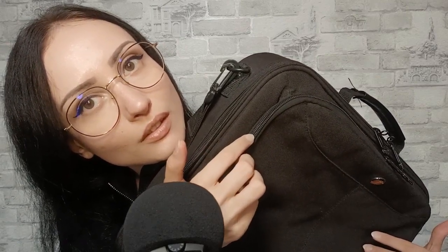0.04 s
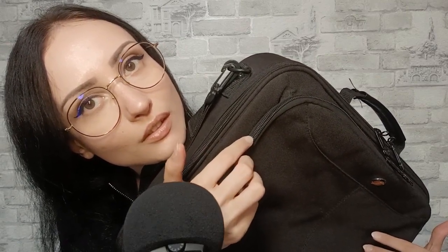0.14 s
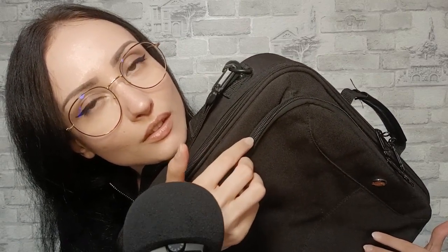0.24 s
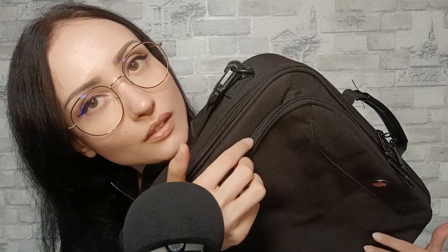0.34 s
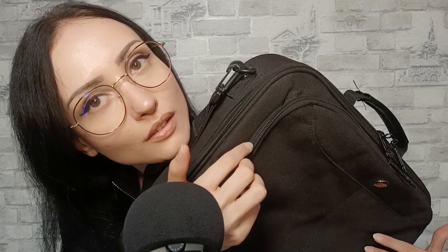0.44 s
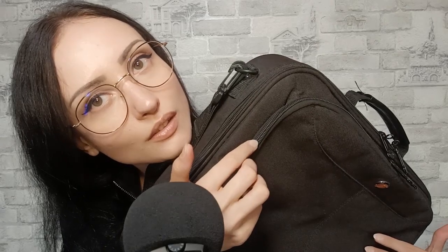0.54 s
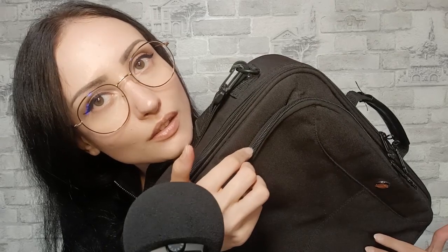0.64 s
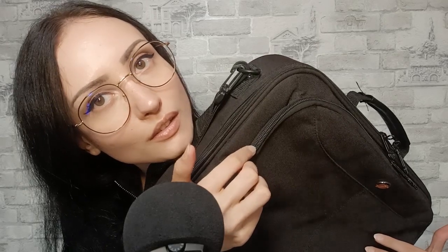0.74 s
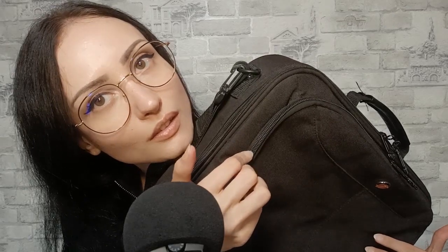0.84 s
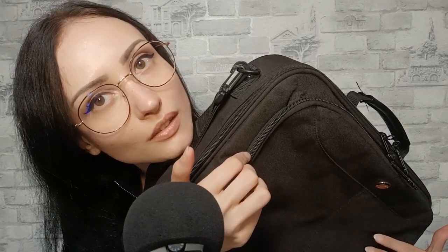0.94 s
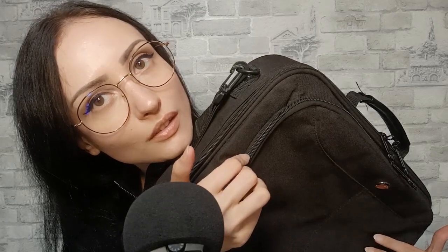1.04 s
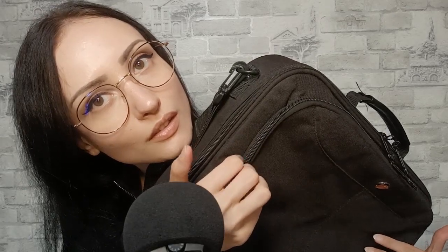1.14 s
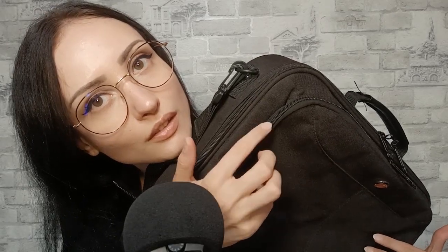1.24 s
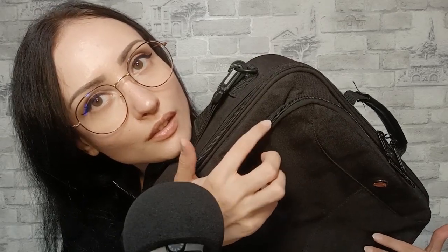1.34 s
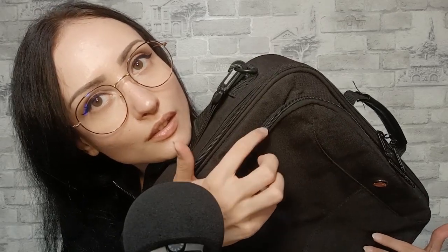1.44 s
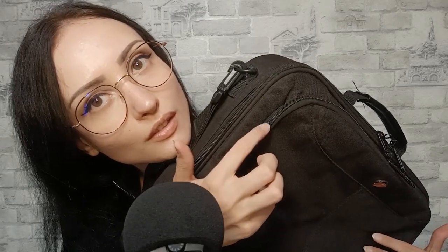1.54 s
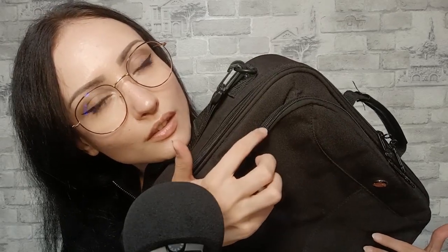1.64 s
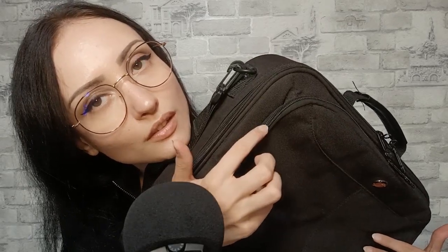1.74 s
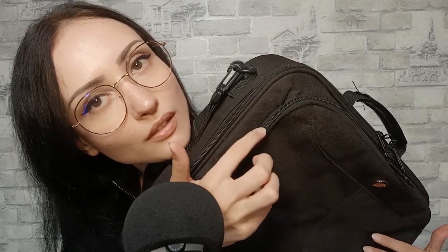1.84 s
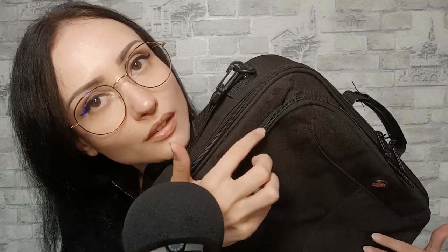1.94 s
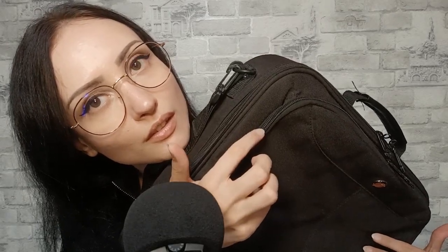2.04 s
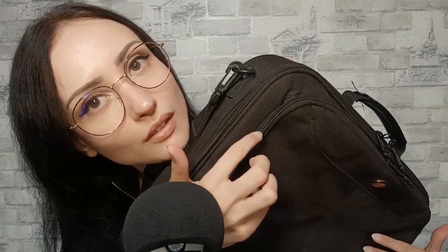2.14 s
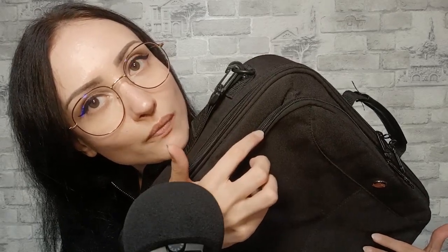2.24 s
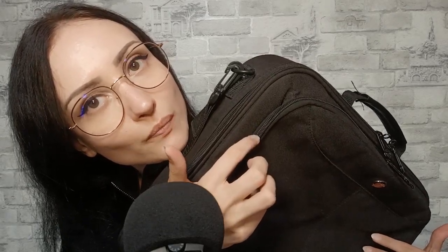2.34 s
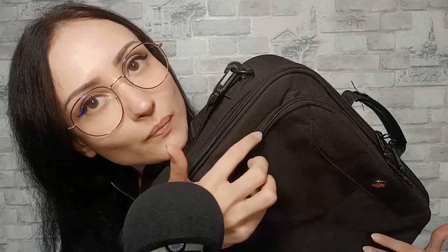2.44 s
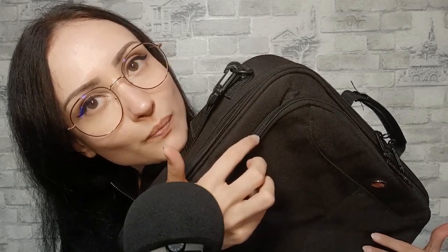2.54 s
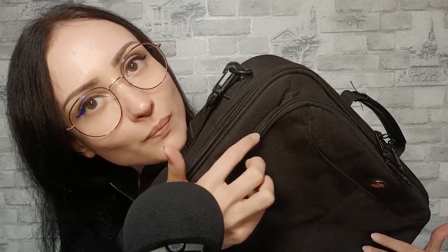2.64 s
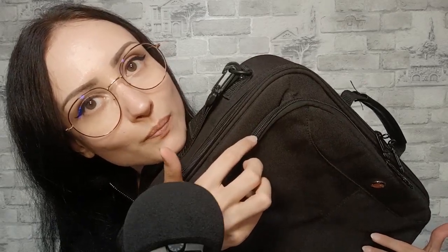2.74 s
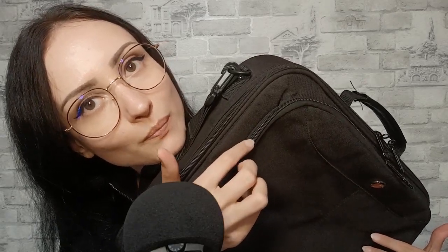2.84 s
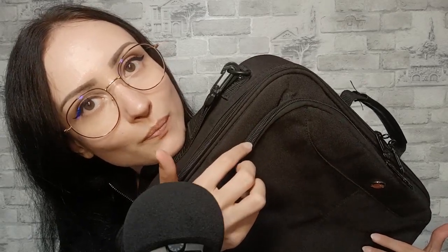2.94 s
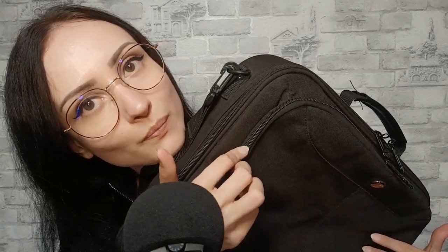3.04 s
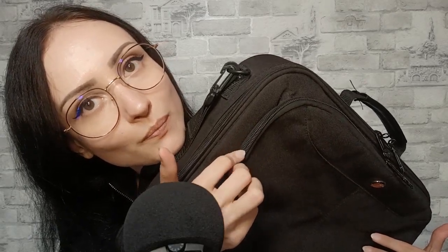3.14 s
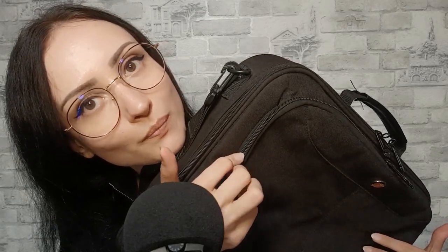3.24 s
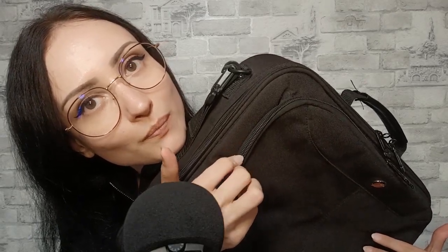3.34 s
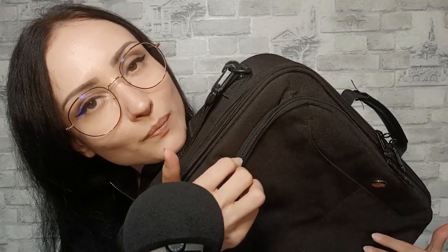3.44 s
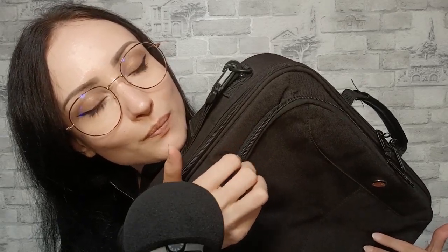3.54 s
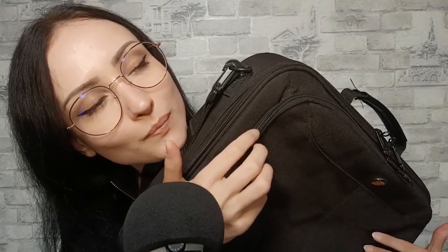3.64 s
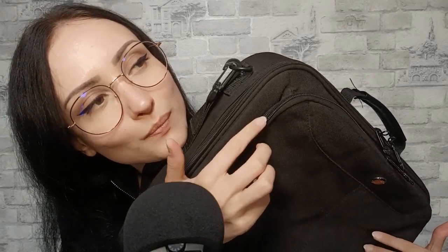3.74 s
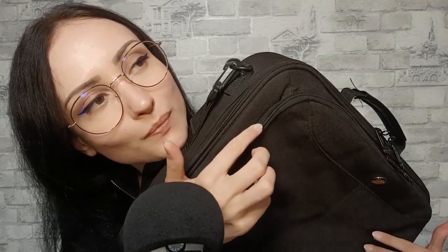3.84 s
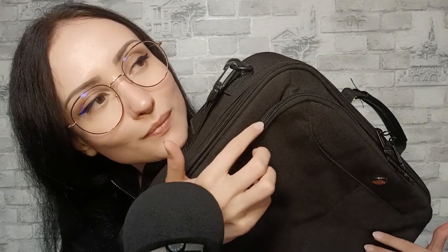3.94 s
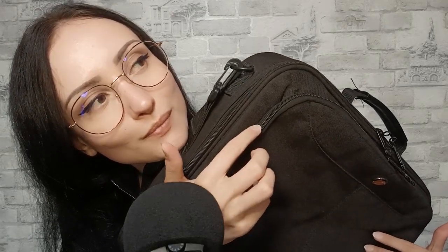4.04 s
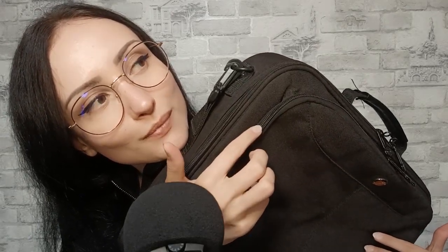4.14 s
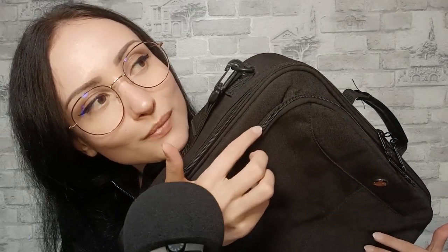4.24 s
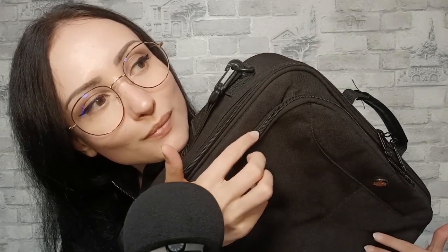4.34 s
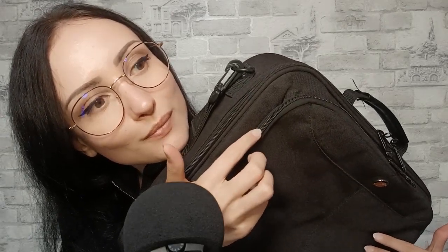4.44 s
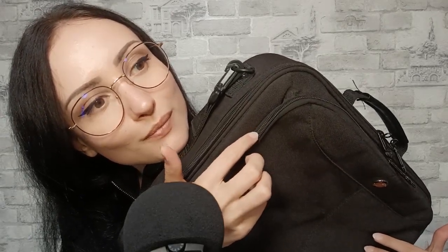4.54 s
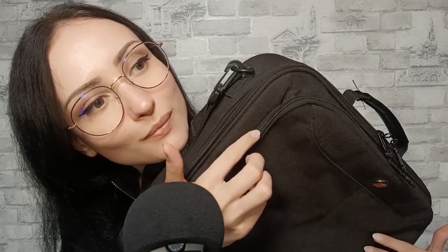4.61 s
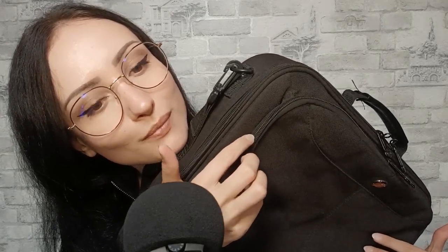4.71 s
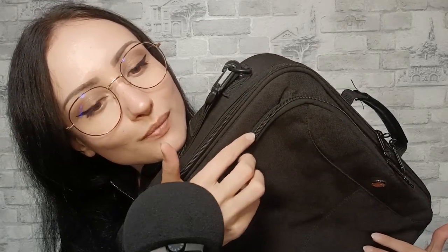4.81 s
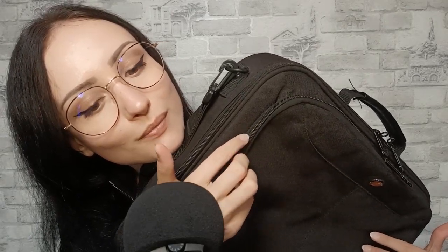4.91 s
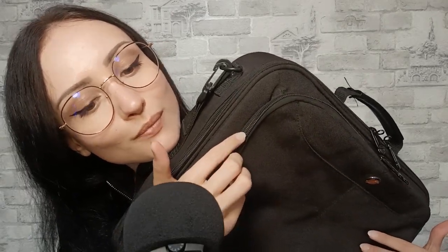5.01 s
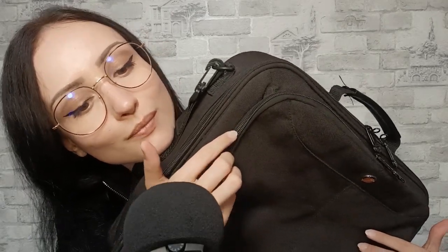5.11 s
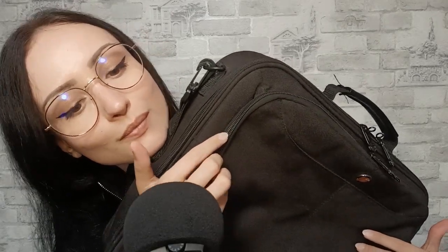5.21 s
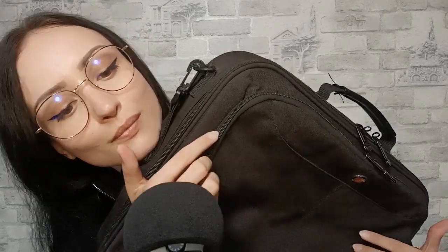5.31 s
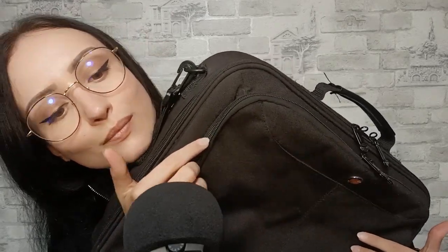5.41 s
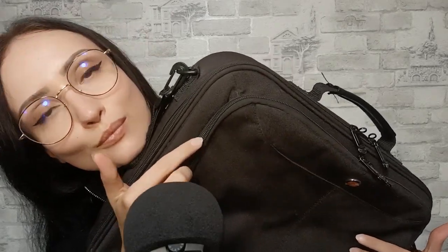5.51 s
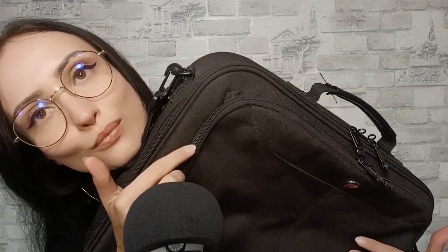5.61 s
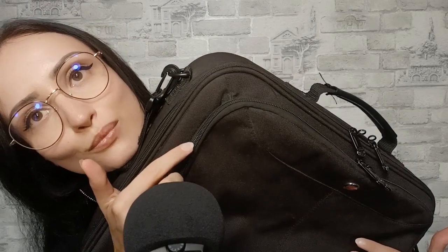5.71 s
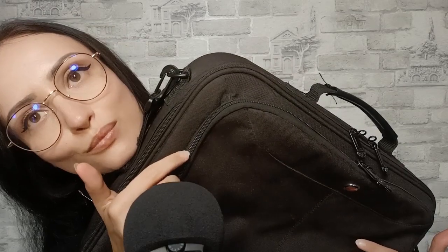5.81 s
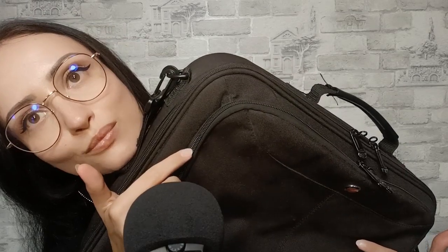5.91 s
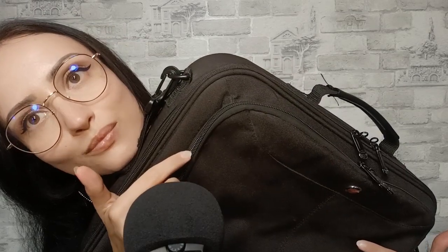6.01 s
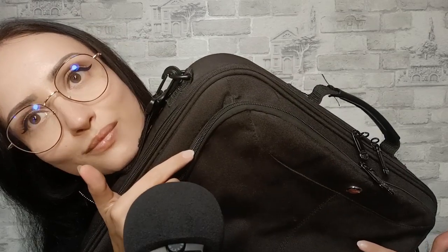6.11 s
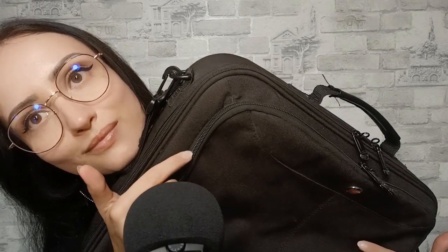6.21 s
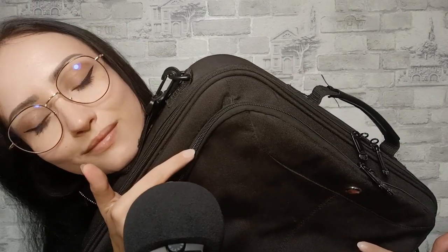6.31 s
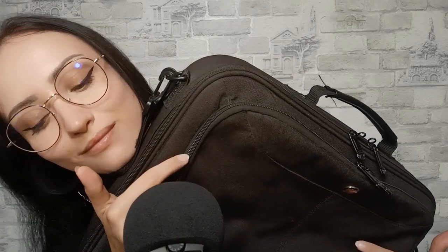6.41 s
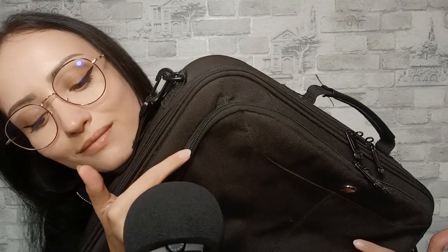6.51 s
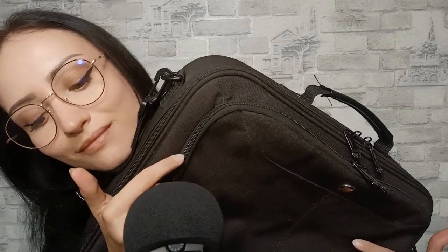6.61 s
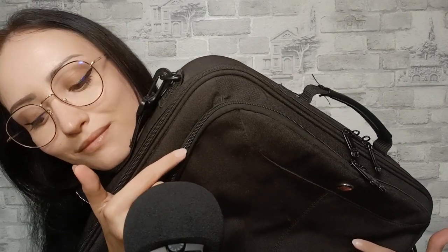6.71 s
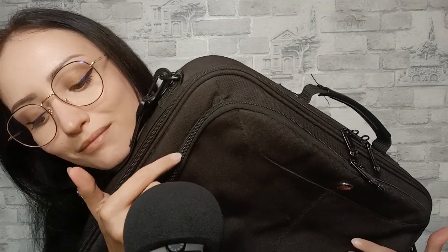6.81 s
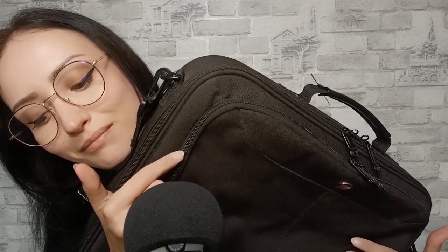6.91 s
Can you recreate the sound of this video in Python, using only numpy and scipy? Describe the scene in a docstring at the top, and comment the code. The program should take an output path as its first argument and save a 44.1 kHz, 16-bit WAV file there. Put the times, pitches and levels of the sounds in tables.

```python
"""Fingernails on a padded bag

Fingernails scratch a padded fabric bag in quick strokes, just behind a stereo microphone in a quiet room.
In each stroke nails catch the cloth, tug it and let it snap back: a filtered push rings the panel's modes.
Fingertips often land first; noise bursts make the rasp of threads, the shaking lining and the skin rubs.
Late on the bag is tilted towards the microphone: the blows grow deeper, the stand is nudged (decaying sines
under a foam squeak) and a zip pull ticks. Low rumble and hiss run throughout."""
import sys
import numpy as np
from scipy import signal
from scipy.fft import rfft, irfft
from scipy.io import wavfile
from scipy.ndimage import uniform_filter1d

SR = 44100
rng = np.random.default_rng(int(sys.argv[2]) if len(sys.argv) > 2 else 0)


def log_audio(samples):
    """Write samples as a 16-bit WAV file to the path given in sys.argv[1]."""
    # one column per channel
    frames = np.atleast_2d(samples).T
    # limit to full scale, then quantise
    limited = np.clip(frames, -1, 1)
    pcm = np.round(limited * 32767).astype(np.int16)
    wavfile.write(sys.argv[1], SR, pcm)


N = 306936
TIME = np.arange(N) / SR
TILT_S = 5.3  # from here the bag is tilted

# Strokes of the hand, in which the nails catch one or more times. Each row: first catch in s, lead of the
# fingertip landing in ms (1 or less: already down), number of catches, first to last catch in ms,
# ratio of each gap to the one before, thump level in dB, rasp level in dB,
# swell from first to last catch in dB, typical release in ms.
STROKES = [ (0.0481, 0, 4, 28, 1.15, -22, -40, -1, .5), (.197, 0, 3, 46.5, 1.86, -23.5, -36.5, 4.5, 0.35),
           (.413, 43, 2, 17, 1, -24.5, -42, 2, 1.4), (0.566, 47, 4, 47.5, .85, -26.5, -42, 0.5, 1.04),
           (0.7562, 17.5, 7, 70.5, .93, -28, -38.5, -6.5, 0.21),
           (.968, 46, 5, 62, 1.07, -29, -45, -2, 0.84), (1.2052, 71.5, 4, 39, .7, -27, -39.5, 7, 0.48),
           (1.565, 0.5, 3, 29, 1.35, -22.5, -38.5, -4.5, 0.49),
           (1.9316, 41, 2, 15, 1, -24.5, -44.5, -1, 0.7), (2.101, 24, 3, 34.5, .65, -21, -38.5, 1.5, 0.32),
           (2.2808, 40, 3, 32, .85, -22, -39, -5.5, 0.33), (2.454, 45, 3, 29, .85, -21.5, -37, -1, 0.25),
           (2.6435, 0, 3, 28, .87, -20, -40, -4.5, 0.22),
           (2.8115, 35.5, 5, 34.5, .65, -21, -36.5, -1, 0.23),
           (2.994, 47, 4, 53.7, 1.17, -23, -38.5, -5, 0.22),
           (3.172, 0, 3, 33.5, 1.06, -30.5, -48, -3, 0.45), (3.2644, 1, 2, 28, 1, -29.5, -46, 0, 0.67),
           (3.3711, 1, 3, 57.5, 1.05, -27.5, -41.5, 4.5, 0.68),
           (3.501, 0.5, 3, 48.5, .92, -23, -32.5, 6, 0.43), (3.995, 34.5, 2, 20.5, 1, -30, -46, 5, 0.86),
           (4.1492, 0.5, 2, 18, 1, -30.5, -45, 1, 1.2), (4.3141, 33, 3, 35.5, .88, -28, -42, -0.5, 1.4),
           (4.4624, 21.5, 4, 54.5, .72, -22.5, -36.5, 0.5, .35), (4.671, 52.5, 2, 19, 1, -29, -42, -7, .65),
           (4.8147, 24.5, 3, 30, .73, -29, -40, -0.5, 1.6), (5.0086, 28, 2, 21, 1, -30.5, -44, 4, 2.7),
           (5.199, 0.5, 2, 37, 1, -25, -36.5, -5, 0.36), (5.3767, 0.5, 2, 19, 1, -17, -33, 3.5, 0.14),
           (5.5735, 32, 3, 38.5, 1.04, -18, -39.5, -0.5, .4), (5.7737, 21, 2, 16, 1, -15.5, -38, 5.5, 0.57),
           (5.928, 8, 5, 49.5, .6, -13, -35, -1, 0.29), (6.116, 0, 3, 38.5, .67, -14, -34.5, -7, 0.19),
           (6.2972, 32, 3, 29, .42, -14, -31.5, 2.5, 0.16), (6.5141, 46, 4, 58.5, .93, -15, -36.5, 1, .4),
           (6.604, 0.5, 1, 0, 1, -11, -44, 0, 0.58), (6.72, 18, 5, 53, .72, -12.5, -40, 1, 0.73),
           (6.807, 0.5, 1, -1.5, 1, -15.5, -62, 0, 1.9), (6.9041, 25, 4, 46.5, .79, -15, -38.5, 10, 0.65)]
# Spectrum of skin or a nail dragging on the weave. Each row: frequency in Hz, relative density in dB per Hz.
DRAG_COLOUR = [(60, -27), (500, 18.5), (1500, 10.5), (3000, 6), (9500, -2), (16000, -21)]


def undb(db):
    """Decibels to gain."""
    return 10 ** (np.asarray(db) / 20)


def unit(x):
    """Scale to an rms of one."""
    return x / np.sqrt(np.mean(x ** 2))


def add(out, sound, s):
    """Mix a stereo sound in from time s."""
    start = int(round(s * SR))
    lo, hi = max(start, 0), min(start + sound.shape[-1], N)
    out[:, lo:hi] += sound[..., lo - start:hi - start]


def decay(t, t60):
    """Exponential fall of 60 dB in t60 seconds."""
    return np.exp(-np.log(1000) * t / t60)


def resonate(x, hz, width_hz):
    """One resonance, gain one at its centre."""
    return signal.lfilter(*signal.iirpeak(hz, hz / width_hz, fs=SR), x + 1e-18)


def colour(x, points):
    """Shape by a (Hz, dB) spectrum, keeping the power of white noise."""
    hz, db = np.transpose(points)
    f = np.maximum(np.fft.rfftfreq(N, 1 / SR), 1)
    gain = unit(undb(np.interp(np.log(f), np.log(hz), db)))
    return irfft(rfft(x) * gain, N)


def stereo_noise(size, side):
    """Noise for two capsules that share part of what they hear; a larger side means they share less."""
    mid, apart = rng.standard_normal((2, size))
    return np.array([mid + side * apart, mid - side * apart]) / np.hypot(1, side)


def on_seam(s):
    """Whether the nails are on the seam at time s."""
    # Stretches in which the nails rake the seam. Each row: start in s, end in s.
    seam_spans = [(0, 1.3), (3.1, 3.6)]
    return any(start < s < end for start, end in seam_spans)


def background(side=0.84, waver_db=3.5, level_db=-44.5):
    """Low room rumble that wavers a little, under steady microphone hiss."""
    # Spectrum of the quiet room. Each row: frequency in Hz, relative density in dB per Hz.
    room_colour = [(12, -50), (25, 4.5), (40, 3), (75, 0), (145, -5.5), (200, -14.5), (260, -12.5),
                   (400, -17.5), (850, -23.5), (1500, -30), (3000, -35.5), (8000, -39.5), (16000, -42.5)]
    air = unit(colour(stereo_noise(N, side), room_colour))
    rumble = signal.lfilter(*signal.butter(1, 300, fs=SR), air)
    drift = unit(uniform_filter1d(rng.standard_normal(N), 5000))
    waver = undb(waver_db * drift)
    return undb(level_db) * (air + (waver - 1) * rumble)


def weave(grain_db):
    """The uneven grip of single threads, changing about every millisecond."""
    grip = unit(uniform_filter1d(rng.standard_normal(N), 50))
    return unit(undb(grain_db * np.minimum(grip, 2.5)))


def rubs():
    """The rub under each stroke and the brushes between them, as rows of one kind."""
    # Skin or sleeve brushing the weave between strokes. Each row: middle in s, swell length in s,
    # level in dB at the middle, frequency in Hz that the touched fold favours.
    brushes = [(1.363, 0.03, -52.5, 890), (1.43, 0.15, -62, 3250), (1.544, 0.021, -56, 1000),
               (3.218, .05, -58, 1400), (3.587, 0.059, -65, 2320), (3.777, 0.21, -61, 3500),
               (5.307, 0.064, -65, 3000), (5.44, 0.035, -60.5, 2500), (6.631, 0.025, -48, 2540),
               (6.711, 0.063, -53, 4320)]
    # level in dB and favoured Hz for each place
    seam, upright, tilted = (-59, 1650), (-64, 3150), (-57.5, 1880)
    lag_s, extra_s = .006, 0.032  # the rub trails the catches and outlasts them
    rows = []
    for s, _, _, length_ms, *_ in STROKES:
        half_s = length_ms / 1000 / 2
        db, hz = tilted if s > TILT_S else seam if on_seam(s) else upright
        rows.append((s + half_s + lag_s, half_s + extra_s, db, hz))
    return rows + brushes


def sliding(fold_size=1.1, fold_q=6.7):
    """Short grainy rubs: noise gripped unevenly by the weave, each coloured by the touched fold of cloth."""
    grip = weave(grain_db=6)
    friction = colour(grip * stereo_noise(N, 0.35), DRAG_COLOUR)
    out = np.zeros((2, N))
    for s, length_s, db, hz in rubs():
        near = np.abs(TIME - s) < 2 * length_s
        pressure = np.exp(-2 * ((TIME[near] - s) / length_s) ** 2)
        rub = friction[:, near]
        rub = unit(rub + fold_size * resonate(rub, hz, hz / fold_q))
        out[:, near] += undb(db) * pressure * rub
    return out


def catches():
    """Stick and slip through each stroke: rows of (s, thump dB, rasp dB, release ms, rasp length ms)."""
    release_growth = 1.44  # the last of several catches lets go this many times more slowly than the first
    rasp_fade_db = -2  # and its rasp loses this much beside its thump
    rasp_ms, rasp_power = 1.24, 1.28  # rasp length at a release of 1 ms; slow releases rasp for longer
    scatter_db = 0.5
    rows = []
    for start_s, _, count, length_ms, slowing, thump_db, rasp_db, swell_db, release_ms in STROKES:
        travel = np.cumsum(slowing ** np.arange(count)) - 1
        times = start_s + length_ms / 1000 * travel / max(travel[-1], 1e-9)
        for k, s in enumerate(times):
            along = (k - (count - 1) / 2) / max(count - 1, 1)  # -0.5 at the first catch, 0.5 at the last
            force_db = swell_db * along + scatter_db * rng.standard_normal()
            release = release_ms * release_growth ** along
            thread_db = rasp_db + force_db + rasp_fade_db * along
            rows.append((s, thump_db + force_db, thread_db, release, rasp_ms * release ** rasp_power))
    return rows


def landings():
    """Fingertips land just ahead of their stroke, or alone."""
    # Separate taps of a fingertip or nail. Each row: time in s, thump peak in dB, rasp level in dB.
    taps = [(.0256, -28, -38), (1.7212, -32.5, -64), (1.7811, -29.5, -49), (5.7251, -21.5, -55),
            (6.0905, -15, -36.5), (6.6869, -15.5, -54)]
    landing_db, thread_db = -6, -28.5  # thump against the stroke's; rasp against that thump
    rows = []
    for s, lead_ms, _, _, _, stroke_db, *_ in STROKES:
        if lead_ms > 1:
            thump_db = stroke_db + landing_db
            rows.append((s - lead_ms / 1000, thump_db, thump_db + thread_db))
    return taps + rows


def panel(force, s, peak_db, left_direct_db=-18, right_direct_db=-9, tilted_direct_db=-7):
    """A push on the cloth is heard directly and through the panel's modes, which shift with the spot touched."""
    # Modes of the cloth panel: bag upright, nails raking the seam, bag tilted. Each row: centre in Hz and
    # width in Hz before the shifts below, left and right relative gain in dB before scatter.
    upright_modes = [(59, 150, -51, 1), (128, 56, -42, -5), (280.4, 60, -8.5, 6.5), (444, 59, 0.5, 6),
                     (542, 135, 4.5, 5), (646, 90, -14, -2.5), (936, 110, -8, 3.5), (1550, 390, -23, -7)]
    seam_modes = [(68.3, 60, -35, 1.5), (133, 28, -32, 3), (280.4, 35, -32, 7.5), (434, 120, 3.5, -8),
                  (596, 54, 2, 9), (870, 55, -9, -3), (1140, 210, -2.5, 2.5), (1544, 150, 0.5, 11)]
    tilted_modes = [(52, 93, 4.5, 7.5), (137.5, 30, 0, 11), (256, 84, -5.5, 8.5), (389, 170, -4, 1.5),
                    (628, 70, 0.5, 5), (796, 37, -6, 0), (1230, 200, 3, 6.5), (1516, 130, 7, 11.5),
                    (2020, 90, -6, -3)]
    # at the end the hand pulls the cloth taut, which raises its low modes
    taut_s, taut_rise = 6.45, 1.29
    tilted = s > TILT_S
    modes = tilted_modes if tilted else seam_modes if on_seam(s) else upright_modes
    direct_db = [tilted_direct_db] * 2 if tilted else [left_direct_db, right_direct_db]
    out = undb(direct_db)[:, None] * force
    for hz, width_hz, left_db, right_db in modes:
        shift, strength = rng.standard_normal(2)
        if s > taut_s and hz < 500:
            hz, width_hz = taut_rise * hz, taut_rise * width_hz
        ring = resonate(force, hz * np.exp(.055 * shift), width_hz)
        gain_db = np.array([[left_db], [right_db]]) + 2.85 * strength
        out = out + undb(gain_db) * ring
    # slow bending waves arrive late (an all-pass), so the cloth swings about as far out as in
    bend_hz = 25 if tilted else 55
    pole = np.exp(-2 * np.pi * bend_hz / SR)
    out = signal.lfilter([pole, -1], [1, -pole], out)
    return out * undb(peak_db) / np.abs(out.mean(axis=0)).max()


def rasp(envelope, db, grain_db=4, side=0.33, crease_hz=4500, crease_size=0.5):
    """Tiny uneven thread slips, tinted by the nearest crease; db is their energy spread over one millisecond."""
    size = len(envelope)
    steps_db = grain_db * np.repeat(rng.standard_normal(size), 6)[:size]  # each grain holds for 6 samples
    burst = envelope * undb(steps_db) * stereo_noise(size, side)
    hz = np.clip(crease_hz * np.exp(.7 * rng.standard_normal()), 1200, 12000)
    burst = burst + crease_size * resonate(burst, hz, hz / 5)
    energy = np.mean(np.sum(burst ** 2, axis=1))
    return burst * undb(db) * np.sqrt(SR / 1000 / energy)


def fingers(plucks, tug_ms=1.04, slip_ms=0.1, settle_ms=5, settle_db=-25, pluck_db=-1, contact_ms=0.78):
    """Nails pull the cloth with growing force until it slips; fingertips push it the other way."""
    # Spectra of threads slipping under a nail or fingertip, and of the coarser threads along the seam.
    # Each row: frequency in Hz, relative density in dB per Hz.
    thread_colour = [(600, 0), (1500, 1), (2500, -4.5), (3800, -2.5), (5500, -1), (7200, -2), (9500, 3.5),
                     (11500, -3.5), (16000, -9.5)]
    seam_colour = [(600, -16), (1500, 1.5), (2500, 2), (3800, -1), (5500, 2), (7200, -1.5), (9500, 1),
                   (11500, 0.5), (16000, -10)]
    lead_s = .012  # room ahead of each slip for the tug
    ms = 1000 * (TIME[:3072] - lead_s)
    before, after = np.minimum(ms, 0), np.maximum(ms, 0)
    thumps, threads, seam_threads = np.zeros((3, 2, N))
    for s, thump_db, thread_db, release_ms, length_ms in plucks:
        force = -np.exp(before / tug_ms - after / release_ms)
        add(thumps, panel(force, s, thump_db + pluck_db), s - lead_s)
        # the rasp swells with the tension, stops at the slip and leaves the fibres settling
        scrape = np.exp(before / length_ms - after / slip_ms)
        settling = np.exp(before / tug_ms - after / settle_ms)
        envelope = scrape + undb(settle_db) * settling
        layer = seam_threads if on_seam(s) else threads
        add(layer, rasp(envelope[:1536], thread_db), s - lead_s)
    for s, thump_db, thread_db in landings():
        age = np.maximum(ms / contact_ms + 2, 0)  # the push peaks at age 2, which is time s
        force = age ** 2 * np.exp(-age)
        add(thumps, panel(force, s, thump_db), s - lead_s)
        add(threads, rasp((age * np.exp(-2 * age))[:1024], thread_db), s - lead_s)
    return thumps + colour(threads, thread_colour) + colour(seam_threads, seam_colour)


def lining(plucks, shake_db=-26, shake_ms=7, drag_db=-19, drag_ms=10, fibre_db=-15):
    """Each snap shakes the loose lining, and the nail drags on with a fading hiss and catches single fibres."""
    # Spectrum of the shaking lining and padding. Each row: frequency in Hz, relative density in dB per Hz.
    lining_colour = [(150, -27), (300, 2), (550, 10), (850, 2.5), (1150, -1), (1600, -2), (2400, -17.5),
                     (6000, -22), (16000, -32)]
    ms = 1000 * TIME[:2000]
    shake, drag = np.zeros((2, 2, N))
    for s, thump_db, thread_db, _, _ in plucks:
        add(shake, undb(thump_db + shake_db) * np.exp(-ms / shake_ms) * stereo_noise(len(ms), 0.28), s)
        add(drag, undb(thread_db + drag_db) * np.exp(-ms / drag_ms) * stereo_noise(len(ms), 0.1), s)
        for lag_s in rng.uniform(-.006, .012, size=2):
            fibre = rasp(np.exp(-ms[:200] / 0.28), min(thread_db, -38) + fibre_db)
            add(drag, fibre, s + lag_s)
    return colour(shake, lining_colour) + colour(drag, DRAG_COLOUR)


def nudge(nudge_s=5.999, squeak_s=6.014, squeak_db=-30):
    """The hand brushes the foam cover, which squeaks briefly (filtered noise) while the stand sways."""
    # Sway of the microphone stand. Each row: frequency in Hz, 60 dB decay time in s,
    # left and right amplitude before the smoothing below.
    stand_modes = [(26, 1.63, 0.1, 0.1), (47.4, 2.3, 0.11, -0.099), (40.7, 0.068, 0.4, 0.18)]
    age = np.maximum(TIME - nudge_s, 0)
    sway = np.zeros((2, N))
    for hz, t60, left, right in stand_modes:
        sway -= np.array([[left], [right]]) * np.sin(2 * np.pi * hz * age) * decay(age, t60)
    rub = stereo_noise(N, .4)
    foam = resonate(rub, 790, 260) + resonate(rub, 460, 400)
    foam = signal.sosfilt(signal.butter(6, 1080, fs=SR, output="sos"), foam)
    # rises over 4 ms, falls over 12 ms
    pressure = np.exp(np.minimum((TIME - squeak_s) / .004, (squeak_s - TIME) / .012))
    return uniform_filter1d(sway, 150) + undb(squeak_db) * unit(foam) * pressure


def zip_pull(s=6.527, tick_db=-38, ring_db=-44, ring_hz=8950, t60=0.15):
    """A small metal pull ticks once and leaves a high ring, a narrow band of noise that dies away."""
    t = TIME[:8192]
    tick = rasp(np.exp(-t / 0.00044), tick_db)
    ring = resonate(stereo_noise(len(t), 0.31), ring_hz, 1300)
    ring = unit(resonate(ring, ring_hz, 1300))
    out = np.zeros((2, N))
    add(out, tick + undb(ring_db) * ring * decay(t, t60), s)
    return out


def room(x, wet_db=-19, t60=0.41):
    """Faint, dull reflections from the walls of a small room, as a decaying noise tail."""
    t = TIME[:12000]
    tail = rng.standard_normal((2, len(t))) * decay(t, t60) * (t > .005)
    tail = tail / np.sqrt(np.sum(tail ** 2, axis=1, keepdims=True))
    echo = signal.fftconvolve(x, tail, axes=1)[:, :N]
    return x + undb(wet_db) * signal.lfilter(*signal.butter(1, 4000, fs=SR), echo)


def scene():
    """The hand and the zip pull sound in the room; the nudge and the background come without reflections."""
    plucks = catches()
    handling = fingers(plucks) + lining(plucks) + sliding() + zip_pull()
    return room(handling) + nudge() + background()


def record(dry):
    """The recorder thins the deepest rumble below 16 Hz and cuts the top above 16.3 kHz."""
    x = signal.sosfilt(signal.butter(1, 16, "high", fs=SR, output="sos"), dry)
    return signal.sosfilt(signal.ellip(8, .2, 70, 16300, fs=SR, output="sos"), x)


dry = scene()
out = record(dry)
log_audio(out)
```